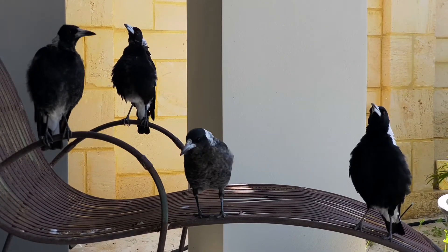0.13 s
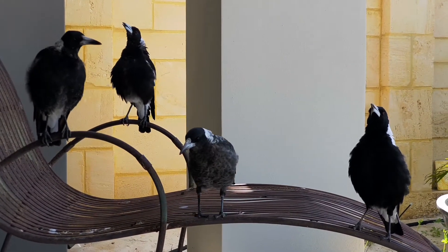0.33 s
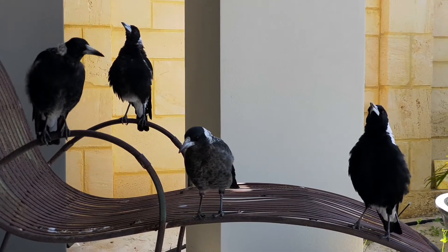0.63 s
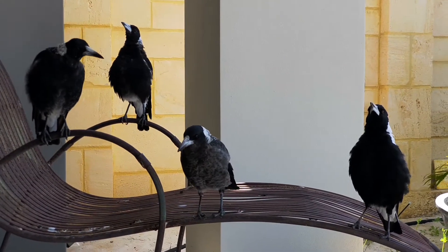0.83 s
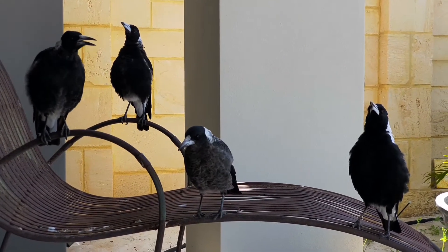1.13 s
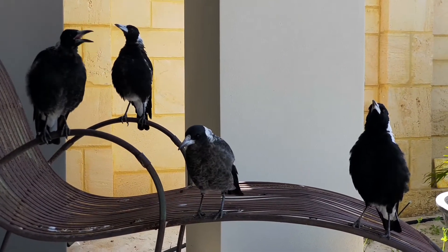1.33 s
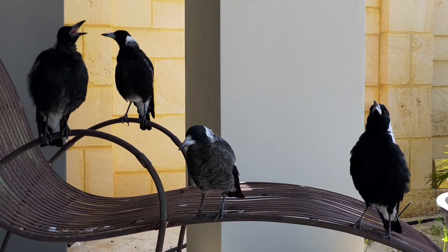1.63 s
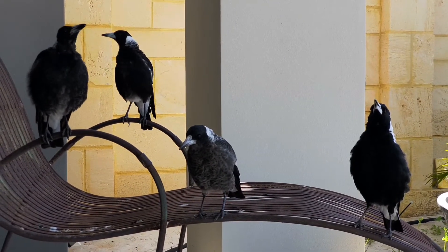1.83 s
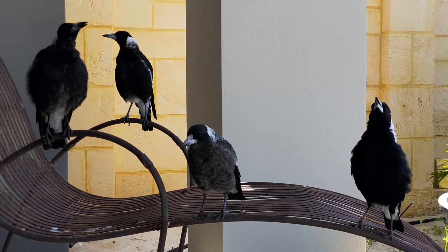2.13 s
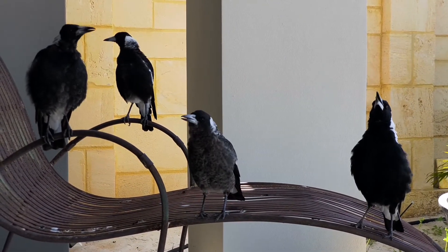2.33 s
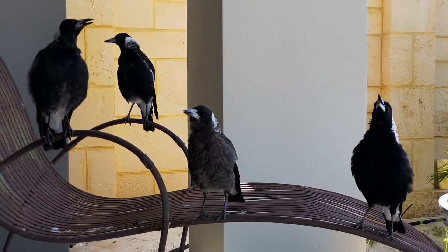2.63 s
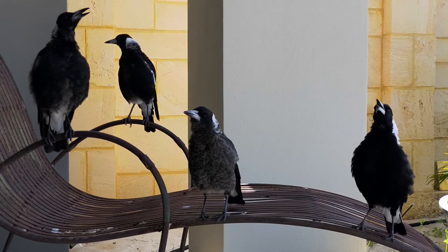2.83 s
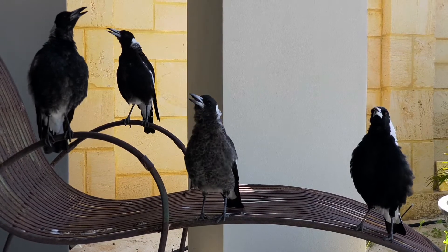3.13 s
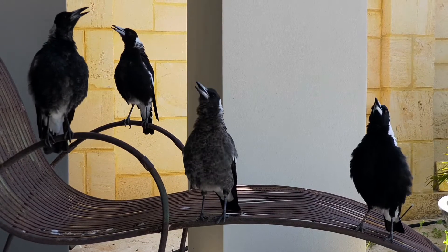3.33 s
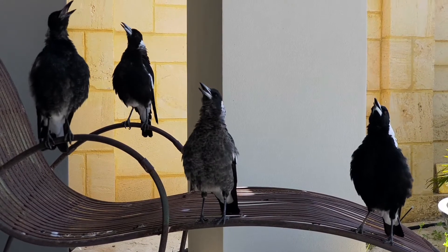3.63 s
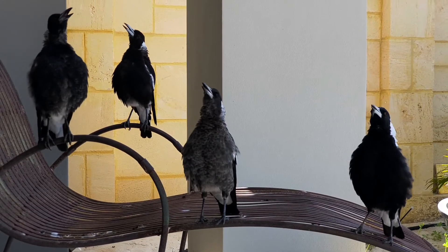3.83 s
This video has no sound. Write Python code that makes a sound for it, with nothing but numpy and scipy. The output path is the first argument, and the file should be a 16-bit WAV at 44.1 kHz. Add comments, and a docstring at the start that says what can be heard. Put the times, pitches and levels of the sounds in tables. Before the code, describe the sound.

Several magpies call close by on a walled porch: soft fluting and clucks, sudden squeals and a falling whistle, quiet warbles, then loud rough carols, a wail and a closing duet, with short wall reflections.

```python
"""Magpies on a walled porch

One bird flutes softly and clucks; another breaks in with squeals, squawks and a falling whistle.
Soft warbles follow, then loud rough carols, a wail above them and a closing duet, over a faint rumble.
Each voice is a fluttering syrinx tone with raspy overtones coloured by the throat; the porch walls answer it."""
import sys
import numpy as np
from scipy import signal
from scipy.fft import rfft, irfft, next_fast_len
from scipy.io import wavfile
from scipy.ndimage import uniform_filter1d, minimum_filter1d, map_coordinates

SR = 44100
rng = np.random.default_rng(int(sys.argv[2]) if len(sys.argv) > 2 else 0)


def wrap_up_sound(samples):
    """Save the sound to the file named by the first command line argument, as 16-bit audio."""
    columns = np.atleast_2d(samples).T
    # keep every value between -1 and 1, then stretch to whole-number steps
    tamed = np.clip(columns, -1, 1)
    steps = np.round(tamed * 32767).astype(np.int16)
    wavfile.write(sys.argv[1], SR, steps)


N = 176400
TOP_HZ = 15500

# NOTE tables, each row: start in s, length in s, start pitch in Hz, end pitch in Hz, tone level in dB,
# roughness, overtone level in dB re tone.
# CONTOUR tables, each row: time in s, pitch in Hz, tone level in dB, roughness, overtone level in dB re tone.
# THROAT tables, each row: frequency in Hz, overtone gain in dB.
# WAY tuples, manner of a voice: phase flutter in rad per unit roughness, flutter rate in knots/s,
# loudness flutter per unit roughness, half the rasp gain, rasp offset at zero roughness, tone half width in Hz.
# PERCH tuples: left over right in dB, left lag in ms, stretch of the wall delays.

# Throat with the bill nearly shut. Each row: frequency in Hz, overtone gain in dB.
SOFT_THROAT = [(1450, 11.5), (1800, -11.5), (2200, 4), (2550, -10.5), (3050, 5.5), (3300, -7.5), (3650, 11),
               (4100, -12), (4600, -5), (5200, -15), (6500, -3), (7400, -14), (8500, -3), (10400, -24),
               (11700, -1.5), (13000, -10.5), (15000, -14)]
# Manner of the soft notes and of the harsh ones, columns as in WAY above.
FLUTE_WAY = (.9, 280, .3, 0.089, .27, 290)
HARSH_WAY = (1.04, 480, 0.49, 0.26, .27, 490)
FLUTE_PERCH = (-1.2, -0.07, 1.1)


def amp(db):
    """Decibels to gain."""
    return 10 ** (np.asarray(db) / 20)


def unit(x):
    """Scale to rms 1."""
    return x / np.sqrt(np.mean(x ** 2) + 1e-20)


def along(points, hz):
    """Interpolate (Hz, value) points on a log frequency axis."""
    point_hz, values = np.transpose(points)
    return np.interp(np.log(hz + 1), np.log(point_hz + 1), values)


def filtered(x, response):
    """Multiply the spectrum of x by a response of frequency."""
    n = x.shape[-1]
    size = next_fast_len(n + SR // 10)
    return irfft(rfft(x, size) * response(np.fft.rfftfreq(size, 1 / SR)), size)[..., :n]


def wobble(n, rate):
    """Smooth random curve, rate knots a second."""
    knots = rng.standard_normal(SR // 10)
    return map_coordinates(knots, [np.arange(n) * rate / SR], mode="wrap")


def patchy(x, depth_db):
    """Uneven grain: each band flares and fades on its own."""
    z = signal.stft(x, nperseg=256)[2]
    field = rng.standard_normal((len(z), N // 128 + 2))
    field = uniform_filter1d(field, size=4, axis=0)
    field = unit(uniform_filter1d(field, size=5, axis=1))
    return signal.istft(z * amp(depth_db * field[:, :z.shape[1]]), nperseg=256)[1][:len(x)]


def call(rows, throat, way):
    """One call: fluttering syrinx tone plus harmonics and pulsed rasp, filtered by the throat."""
    attack_s, release_s = .018, 0.0056
    trill_hz, trill_depth, trill_drift_rad = 71.7, 0.48, 1
    grain_db, patch_db = 2, 5  # per unit roughness
    flutter_rad, flutter_rate, shake, half_rasp, steady, width_hz = way
    s, *columns = np.transpose(rows)
    first = int(max(s[0] - attack_s / 2, 0) * SR)
    t = np.arange(first, int((s[-1] + release_s / 2) * SR)) / SR
    n = len(t)
    hz, db, rough, over_db = [np.interp(t, s, column) for column in columns]

    glide = 2 * np.pi * np.cumsum(hz) / SR
    jitter = flutter_rad * rough * wobble(n, flutter_rate)
    phase = glide + jitter

    # a rough voice pulses unevenly
    trill_phase = 2 * np.pi * trill_hz * t + trill_drift_rad * wobble(n, trill_hz)
    trill = trill_depth * np.sin(trill_phase)
    pulsing = 1 + rough * (trill + shake * wobble(n, flutter_rate))

    # limit the tone's sidebands at baseband, then return it to pitch
    baseband = pulsing * np.array([np.cos(jitter), np.sin(jitter)])
    a, b = filtered(baseband, lambda f: 1 / (1 + (f / width_hz) ** 4))
    tone = unit(a * np.sin(glide) + b * np.cos(glide))

    top_harmonic = int(TOP_HZ / hz.min())
    stack = sum(np.sin(k * phase) * (k * hz < TOP_HZ) for k in range(2, top_harmonic + 1))
    rasp = 2 * half_rasp * (steady + rough) * rng.standard_normal(N)[:n] * (1 + np.cos(phase))
    buzz = unit(stack) + rasp

    def shaped(points):
        """Throat colour, with a steep cut below the mean pitch."""
        def response(f):
            return amp(along(points, f)) / (1 + (0.92 * hz.mean() / (f + 1)) ** 10)
        return unit(filtered(buzz, response))

    # crossfade from the first gain column to the last
    shape = np.array(throat)
    closing = np.linspace(0, 1, n)
    overtones = (1 - closing) * shaped(shape[:, [0, 1]]) + closing * shaped(shape[:, [0, -1]])
    overtones = patchy(overtones, patch_db * rough.mean())
    bursts = amp(grain_db * rough * wobble(n, 2 * trill_hz))
    overtones = unit(pulsing * overtones * bursts)

    rise = (t - s[0]) / attack_s + .5
    fall = (t[-1] - t) / release_s
    gate = np.sin(np.pi / 2 * np.clip(np.minimum(rise, fall), 0, 1)) ** 2
    voice = gate * amp(db) * (tone + amp(over_db) * overtones)
    return np.pad(voice, (round(t[0] * SR), N))[:N]


def notes(table, throat, way):
    """Short calls that glide straight from one pitch to another."""
    total = 0
    for start_s, length_s, hz_1, hz_2, db, rough, over_db in table:
        rows = [(start_s, hz_1, db, rough, over_db), (start_s + length_s, hz_2, db, rough, over_db)]
        total = total + call(rows, throat, way)
    return total


def porch(x, perch):
    """A source at its perch: direct sound, early wall answers and a short decaying noise tail."""
    # Near walls and floor. Each row: delay to left ear in ms, to right ear in ms (before stretch), gain in dB.
    near_walls = [(2.3, 2.6, -14), (4.9, 5.4, -9.5), (7.7, 9.3, -6), (12.6, 14, -8), (17.9, 19.1, -8.5)]
    # Tail decay. Each row: frequency in Hz, t60 in s.
    decay = [(500, 0.15), (1300, 0.29), (3500, 0.26), (9000, 0.23), (15000, 0.065)]
    tail_db, lowest_hz = -4, 484.4
    pan_db, lag_ms, stretch = perch
    sides = np.array([[.5], [-.5]])

    def late(f, ms):
        return np.exp(-2j * np.pi * f * ms / 1000)

    def answers(f):
        return sum(amp(db) * late(f, stretch * np.array([[left_ms], [right_ms]]))
                   for left_ms, right_ms, db in near_walls)

    x = filtered(x, lambda f: 1 / (1 + (lowest_hz / (f + 1)) ** 10))
    near = filtered(x, lambda f: amp(pan_db * sides) * (late(f, sides * lag_ms) + answers(f)))
    hz, t, z = signal.stft(rng.standard_normal((2, SR // 2)), SR, nperseg=256)
    tail = signal.istft(z * amp(-60 * t / along(decay, hz)[:, None]), SR, nperseg=256)[1]
    tail = tail / np.linalg.norm(tail[0])
    return near + amp(tail_db) * signal.fftconvolve(x[None], tail, axes=1)[:, :N]


def rustle():
    """Inaudibly faint tail of a high rustle: coloured noise, already nearly decayed at time zero."""
    # Envelope: start in s, rise in s, t60 in s, peak level in dB.
    envelope = (-1.14, 0.33, 0.86, -57.5)
    # Each row: frequency in Hz, gain in dB.
    colour = [(2000, -32), (6200, 5), (15000, -4.5)]
    start_s, rise_s, t60_s, peak_db = envelope
    t = np.arange(N) / SR - start_s
    level = np.clip(t / rise_s, 0, 1) * amp(-60 * np.maximum(t - rise_s, 0) / t60_s)
    noise = unit(filtered(rng.standard_normal(N), lambda f: amp(along(colour, f))))
    return porch(amp(peak_db) * level * noise, FLUTE_PERCH)


def air():
    """Faint outdoor rumble: coloured noise, nearly the same on both sides."""
    # Each row: frequency in Hz, gain in dB.
    colour = [(25, -8), (45, 1.5), (150, -12), (600, -18.5), (5000, -41), (15000, -54)]
    level_db, side_db = -58, -12
    mid, side = unit(filtered(rng.standard_normal((2, N)), lambda f: amp(along(colour, f))))
    return amp(level_db) * (mid + amp(side_db) * np.array([side, -side]))


def fluter():
    """Soft fluting with the bill nearly shut, and two harsher clucks with few high overtones."""
    # Fluting and clucks, columns as in NOTE above.
    flutes = [(-.02, 0.25, 726.5, 708, -29.5, 0.32, -20.5), (-.02, 0.22, 804, 788.4, -27.5, 0.34, -29),
              (.243, 0.02, 728, 732, -19.5, 0.11, -27.5), (.28, .07, 743, 607, -35, 1.1, -24),
              (.366, 0.024, 902, 927, -15, 0.15, -18.5), (.403, 0.031, 1067, 1097, -18, 0, -32.5)]
    clucks = [(.612, 0.062, 821, 604, -35.5, 1.2, -7), (.862, 0.036, 700, 559.5, -35, 0.9, -12)]
    # Each row: frequency in Hz, overtone gain in dB.
    cluck_throat = [(1200, 6), (2300, -35), (7300, -25), (15000, -51)]
    voice = notes(flutes, SOFT_THROAT, FLUTE_WAY) + notes(clucks, cluck_throat, HARSH_WAY)
    return porch(voice, FLUTE_PERCH)


def squealer():
    """Open-billed squeals that break down into squawks, then a long falling whistle."""
    # Harsh falling notes, columns as in NOTE above.
    squawks = [(1.045, 0.012, 1182, 1020, -20.5, 0.25, -9.5), (1.068, 0.021, 697, 633, -28, 0.5, -9),
               (1.192, 0.043, 1133, 607.4, -26, 0.5, -0.5), (1.338, 0.011, 1500, 1607, -28, 0.9, 5),
               (1.398, 0.036, 1644, 757.4, -26, 0.5, 4.5), (1.45, 0.027, 1210, 1210, -41, 0.6, 16)]
    # Two squeals and the whistle, columns as in CONTOUR above.
    squeals = [
        [(1.074, 2271, -19, 0.1, -18), (1.083, 2027, -13.5, 0.15, -18), (1.1, 1901, -25.5, 0.7, -11),
         (1.125, 1864, -15, 0.6, -13), (1.148, 2191, -9.5, 0.1, -13.5), (1.165, 2355, -9.5, 0.3, -11),
         (1.186, 2299, -19, 0.9, -9.5), (1.198, 1746, -20.5, .9, -10.5), (1.215, 1579, -16.5, 0.5, -17.5),
         (1.232, 1437, -21.5, 0.8, -9)],
        [(1.347, 2320, -29.5, 0, 4.5), (1.355, 2387, -13, 0.2, -3.5), (1.375, 2493, -22.5, 0.1, 6),
         (1.391, 2318, -15, 0.3, -8.5), (1.405, 1858, -23.5, 0.9, -10), (1.425, 1459, -22.5, 0.6, -12.5)],
    ]
    whistle = [(1.455, 2440, -21, 0.77, -8.5), (1.5, 2467, -28.5, 0, 10.5), (1.53, 2392, -26.5, 0, 4),
               (1.56, 2373, -9, 0.06, -2), (1.61, 2311, -11.5, 0, -9), (1.65, 2201, -8.5, 0.02, -8.5),
               (1.7, 2088, -6.5, 0, -16), (1.75, 2039, -20.5, .08, -4.5), (1.79, 1989, -13, 0.11, -13.5),
               (1.84, 1875, -26, 0.05, -21.5)]
    # Each row: frequency in Hz, overtone gain in dB.
    squeal_throat = [(4900, 4.5), (6000, -0.5), (8000, 0.5), (10000, -12.5), (15000, -17.5)]
    squawk_throat = [(2300, 6), (3200, 0), (4800, -0.5), (10000, -23)]
    # Manners, columns as in WAY above.
    squeal_way = (1.2, 460, 0.28, .14, .03, 710)
    whistle_way = (1.8, 460, .35, 0.0081, .27, 500)
    voice = sum(call(rows, squeal_throat, squeal_way) for rows in squeals)
    voice = voice + notes(squawks, squawk_throat, HARSH_WAY)
    voice = voice + call(whistle, squeal_throat, whistle_way)
    return porch(voice, (3.8, -.11, 0.72))


def warbler():
    """A second bird's soft warble: short gliding tones with the nearly shut bill's colour."""
    # Warbled notes, columns as in NOTE above.
    warbles = [(1.99, 0.077, 786, 772, -41, .7, -27), (1.99, 0.081, 493, 593.4, -47, 1, -20.5),
               (2.075, 0.088, 796, 859, -29, 1, -21.5), (2.125, 0.049, 810, 786, -21, 0.01, -39),
               (2.19, .09, 781, 732, -33, 0.5, -20), (2.292, 0.036, 1369, 1311, -24, 0.2, -26.5),
               (2.37, .06, 814, 789.4, -25.5, 0.07, -31), (2.37, .12, 896, 952, -33.5, 0.5, -26.5),
               (2.485, 0.065, 792, 758, -29.5, .4, -31), (3.04, 0.02, 1297, 1294, -7.5, 0.2, -41),
               (3.235, 0.037, 799, 785, -22, 0.2, -31), (3.6, 0.013, 1156, 1205, -2.5, 0.1, -29.5),
               (3.9, 0.18, 685, 728, -25, 0.4, -23.5), (3.91, 0.077, 767.3, 798, -17.5, 0.3, -13.5)]
    return porch(notes(warbles, SOFT_THROAT, FLUTE_WAY), (-1.5, 0.25, 1.1))


def caroller():
    """Loud carols: overlapping, mostly falling tones roughened by flutter and rasp."""
    # Three carols, columns as in CONTOUR above.
    carols = [
        [(2.66, 1244, -29, .1, -44.5), (2.7, 1242, -20.5, 0.49, -22), (2.745, 1231, -7, 0.2, -27),
         (2.78, 1254, -6.5, 0, -20.5), (2.86, 1251, -7, 0.4, -14), (2.91, 1198, -18, .8, -11),
         (2.96, 1102, -19, 0.8, -5), (3, 982, -15.5, 0.5, -11.5), (3.035, 1023, -26, 1, -9)],
        [(2.695, 1050, -32.5, .8, -8), (2.75, 1006, -32, 0.8, -4), (2.89, 1062, -37, .9, -0.5),
         (2.925, 1040, -23, .6, -8.5), (3, 951, -25, 0.2, -13.5)],
        [(3.04, 1058, -25, 1, -4.5), (3.1, 1041, -17, 0.4, -11), (3.145, 1036, -13, 0.5, -14),
         (3.195, 933, -16.5, .5, -9.5), (3.25, 912, -25.5, 0.6, -7.5), (3.29, 903, -29.5, 0.4, -15.5)],
    ]
    # Each row: frequency in Hz, overtone gain in dB.
    throat = [(1900, -10), (2450, -10), (2750, -16), (3150, -1), (3480, 15), (3950, -11), (4200, -3.5),
              (4500, -10.5), (5000, 3), (5500, -9), (5950, -37.5), (6400, -9.5), (6900, 4), (7700, -10),
              (8600, 0), (9250, -41.5), (9800, -14), (10700, -6), (12000, -5.5), (13300, -2),
              (13900, -17.5), (15500, -16.5)]
    # Manner, columns as in WAY above.
    way = (1.3, 190, 0.58, 0.28, 0.36, 320)
    return porch(sum(call(rows, throat, way) for rows in carols), (1.4, .23, 1.05))


def wailer():
    """A long wail above the carols: one fluttering tone that rises briefly, then falls."""
    # Columns as in CONTOUR above.
    wail = [(3.085, 1870, -35.5, 0.4, -16.5), (3.125, 1776, -24.5, 0.8, -16.5), (3.165, 1835, -36, 1, -3.5),
            (3.2, 2009, -32.5, 0.6, -4.5), (3.24, 1829, -30, .5, -7.5), (3.3, 1733, -16, 0.15, -13.5),
            (3.36, 1651, -28.5, 0.8, -0.5), (3.42, 1544, -23.5, 0.7, -3), (3.46, 1476, -15, .3, -14.5),
            (3.51, 1438, -27, 0.8, -3), (3.56, 1388, -17, 0.2, -25.5)]
    # Each row: frequency in Hz, overtone gain in dB.
    throat = [(2300, -22.5), (3100, 7), (3700, -10.5), (4200, 6), (4800, 8), (5400, 0.5), (6000, -1),
              (7000, -0.5), (9000, -9), (13200, -9.5), (15000, -26)]
    # Manner, columns as in WAY above.
    way = (1.25, 280, .45, 0.17, .3, 310)
    return porch(call(wail, throat, way), (0.71, -.12, .9))


def duet():
    """Two birds carol together; their overtone colour shifts as the bills close."""
    # One contour per bird, columns as in CONTOUR above.
    birds = [
        [(3.588, 900, -19.5, 1.4, -17), (3.615, 1251, -5.5, 0.8, -11.5), (3.65, 1336, -15, 0.9, -8),
         (3.74, 1260, -8.5, 1.1, -9), (3.8, 1155, -15, 0.7, -17), (3.9, 1145, -10.5, 0.8, -16.5),
         (4, 1095, -12, 0.5, -12.5)],
        [(3.65, 1200, -8.5, 0.6, -10.5), (3.75, 1111, -19.5, 1.1, -11.5), (3.84, 1001, -18.5, 1, -8.5),
         (3.92, 964.6, -21.5, 1, -12.5), (4, 961, -23.5, 1, -4)],
    ]
    # Each row: frequency in Hz, overtone gain at the start in dB, at the end in dB.
    throat = [(2000, -6, -9), (2470, -5, -18.5), (2820, -9, -9.5), (3220, 8.5, 8), (3450, 3, 12),
              (3900, -1.5, -7), (4300, 0, -5.5), (5300, 6.5, 3), (6200, -11.5, -18), (7300, -5, -5.5),
              (9800, -14.5, -15), (15500, -19, -15.5)]
    # Manner, columns as in WAY above.
    way = (1.37, 200, 0.71, 0.14, .2, 560)
    return porch(sum(call(rows, throat, way) for rows in birds), (1, -0.11, 1.3))


def scene():
    """All the birds over the background."""
    return rustle() + air() + fluter() + squealer() + warbler() + caroller() + wailer() + duet()


def record(dry):
    """Limit the loudest peaks, fade the end briefly and cut everything above the band limit."""
    ceiling, limit_s, fade_s = .95, .004, .006
    size = int(limit_s * SR)
    peak = np.abs(dry).max(axis=0)
    gain = minimum_filter1d(ceiling / np.maximum(peak, ceiling), 2 * size)
    gain = uniform_filter1d(uniform_filter1d(gain, size), size)
    fade = np.sin(np.pi / 2 * np.minimum(np.arange(N)[::-1] / (fade_s * SR), 1)) ** 2
    return filtered(fade * dry * gain, lambda hz: hz < TOP_HZ)


dry = scene()
out = record(dry)
wrap_up_sound(out)
```